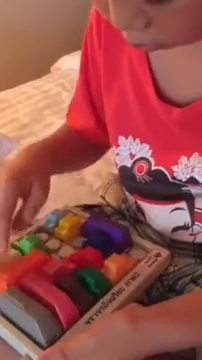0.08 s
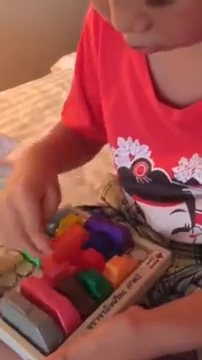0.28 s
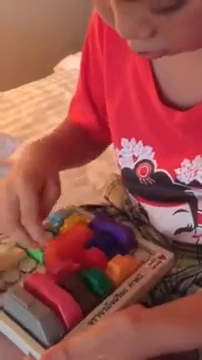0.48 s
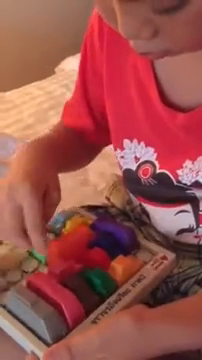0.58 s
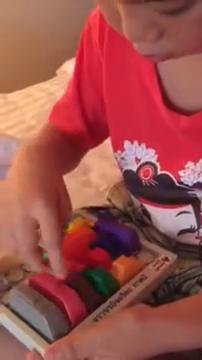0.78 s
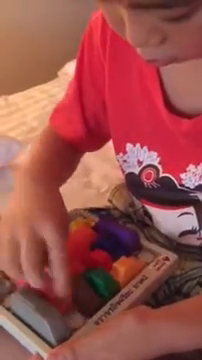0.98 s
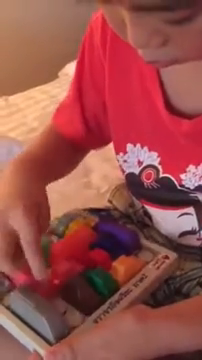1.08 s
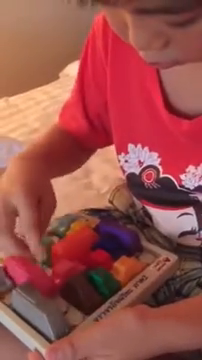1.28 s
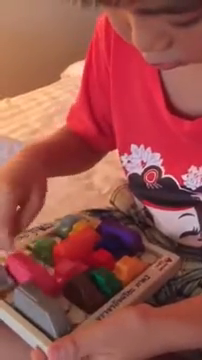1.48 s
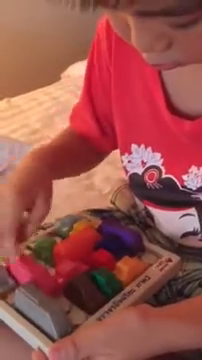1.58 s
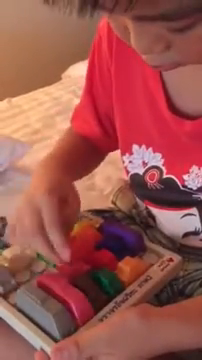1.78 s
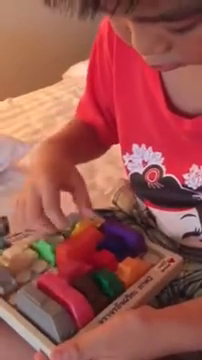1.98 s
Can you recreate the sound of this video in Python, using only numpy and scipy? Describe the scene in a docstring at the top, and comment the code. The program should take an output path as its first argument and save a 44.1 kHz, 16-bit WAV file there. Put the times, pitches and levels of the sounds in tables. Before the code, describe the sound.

Small plastic blocks click, clack and briefly scrape in a tray, close up, with a faint machine drone

```python
"""Hollow plastic pieces clack against each other and a plastic tray on a bed, close to a phone, in a small soft room.
Each clack is a short chatter of contacts that clicks dryly and rings the piece and the tray; pieces also scrape.
Single fading modes sound under the hardest blows, and decaying noise bands make the room.
A machine drones on many orders of its shaft speed and drops in level near the end, beside a steady low tone.
Noise shaped in frequency and level makes low rumble and hiss."""
import sys
import numpy as np
from scipy import signal
from scipy.fft import rfft, irfft
from scipy.io import wavfile
from scipy.ndimage import uniform_filter1d

SR = 44100
rng = np.random.default_rng(int(sys.argv[2]) if len(sys.argv) > 2 else 0)


def volts_from_db(level):
    """Convert decibel levels to linear amplitude ratios."""
    exponent = np.asarray(level, float) / 20
    return 10 ** exponent


def dump(signal):
    """Clip the signal to [-1, 1] and save it as 16-bit WAV at the path in sys.argv[1]."""
    limited = np.clip(np.atleast_2d(signal).T, -1, 1)
    pcm = np.round(limited * 32767).astype(np.int16)
    wavfile.write(sys.argv[1], SR, pcm)


N = 90405  # samples in the scene
RISE_S = 0.0008  # time constant of the onset of clacks and knocks


def curve(rows, at, log=False):
    """Straight lines between the first two columns of rows, optionally over log frequency."""
    x, y = np.array(rows, float).T[:2]
    if log:
        return np.interp(np.log(at + 1), np.log(x), y)
    return np.interp(at, x, y)


def colour(x, db_of_hz):
    """Causal minimum-phase filter with the given gain in dB."""
    hz = np.arange(2049) * SR / 4096
    cepstrum = irfft(db_of_hz(hz) * np.log(10) / 20)
    # folding the cepstrum forward in time makes the filter causal
    cepstrum[1:2048] *= 2
    cepstrum[2049:] = 0
    response = irfft(np.exp(rfft(cepstrum)))
    return signal.fftconvolve(x, response)[:len(x)]


def unit_rms(x):
    """Scale to rms 1."""
    return x / np.sqrt(np.mean(x ** 2) + 1e-30)


def unit_energy(x):
    """Scale to a sum of squares of 1."""
    return x / np.sqrt(np.sum(x ** 2))


def ring(hz, t60, t):
    """One mode: a sine that fades by 60 dB in t60 seconds."""
    return np.sin(2 * np.pi * hz * t) * np.exp(-np.log(1000) * t / t60)


def walk(rate):
    """Slow random wander with rms 1, from smoothed steps drawn rate times per second."""
    hold = int(SR / rate)
    steps = np.repeat(rng.standard_normal(N // hold + 1), hold)
    smooth = uniform_filter1d(uniform_filter1d(steps, hold), hold)
    return unit_rms(smooth[:N])


def add(out, x, start_s):
    """Mix x into out at start_s seconds."""
    i = int(start_s * SR)
    out[i:i + len(x)] += x[:N - i]


def contacts(env):
    """Dense tiny contacts of uneven size, carrying the energy of the envelope."""
    scatter_db = 2
    push, size = rng.standard_normal((2, len(env)))
    x = env * push * volts_from_db(scatter_db * size)
    return x * np.sqrt(np.sum(env ** 2) / np.sum(x ** 2))


def dry_click(t, treble_db):
    """A contact without ringing: an impulse coloured by the plastic body, thin in the bass."""
    # Spectrum of a dry contact. Each row: frequency in Hz, relative level in dB.
    body = [(150, -64), (250, -25.5), (779, -18), (1010, -7.5), (1600, -6.5), (1870, -0.5), (3150, -5.5),
            (4100, -9), (4970, -11), (7050, -13), (10400, -17.5), (13500, -17), (15000, -24.5),
            (16300, -52)]
    treble_hz, thin_below_hz, thin_db = 5200, 1100, -4

    def gain_db(f):
        treble = treble_db / (1 + (treble_hz / (f + 1)) ** 4)
        thin = thin_db / (1 + (f / thin_below_hz) ** 4)
        return curve(body, f, True) + treble + thin

    return colour((t == 0) * 1.0, gain_db)


def piece_ring(hz, t):
    """The walls of a hollow piece ring as modes around its main pitch."""
    # One value per wall mode: pitch as a ratio to the main pitch.
    walls = [1, .94, 1.08, 2.0]
    # One value per wall mode: relative level in dB.
    wall_db = [15.5, -26, 5, -8.5]
    # One value per wall mode: ring time (t60) in seconds.
    wall_t60 = [.055, .03, .03, .025]
    return sum(volts_from_db(db) * ring(hz * ratio, t60, t) for ratio, db, t60 in zip(walls, wall_db, wall_t60))


def tray_ring(t):
    """The plastic tray rings on fixed modes whose levels differ by chance at each excitation."""
    # Modes of the tray. Each row: frequency in Hz, relative level in dB.
    modes = [(570, -25), (850, -26), (1150, -21), (1450, -32), (1800, -15.5), (2090, -0.5), (2310, -10.5),
             (2620, -12), (3300, -10), (3600, -8), (3950, 4.5), (4180, 9.5), (4540, 4), (5300, -12.5),
             (6300, -7), (7000, 0.5)]
    t60, scatter_db = 0.035, 2  # s, dB
    chance = rng.standard_normal(len(modes))
    return sum(volts_from_db(db + scatter_db * c) * ring(hz, t60, t) for (hz, db), c in zip(modes, chance))


def struck(push, hz, ring_db, tray_db, treble_db):
    """Contacts click dryly and ring the piece and the tray, at levels in dB relative to the click."""
    t = np.arange(4096) / SR
    response = unit_energy(dry_click(t, treble_db))
    response = response + volts_from_db(ring_db) * unit_energy(piece_ring(hz, t))
    response = response + volts_from_db(tray_db) * unit_energy(tray_ring(t))
    return signal.fftconvolve(push, response)


def clacks(t):
    """Each clack is a burst of contacts that rises fast and dies away in a few milliseconds."""
    # Each row: start in seconds, level in dB, piece pitch in Hz, piece ring in dB re click,
    # tray ring in dB re click, treble boost of the click in dB.
    hits = [(0.248, -13.5, 1600, -4, -8.5, 1), (0.2913, -7.5, 1842, -3.5, -23.5, 3),
            (0.3042, -21.5, 1880, 0.5, -3.5, -6), (0.3251, -21, 1900, 4.5, -6, -1),
            (0.3328, -12.5, 1834, -1.5, -10.5, -5), (0.3544, -2.5, 2040, -15.5, -7, 7.5),
            (.357, -12.5, 2055, -4.5, -5.5, -1), (0.471, -38.5, 2383, 6.5, -12, -6),
            (.5107, -44, 2064, -7.5, -9.5, -16), (.984, -45, 3600, -4.5, -8, 0),
            (1.002, -44, 3325, 1, -9, -10), (1.0075, -44, 1920, -0.5, -5.5, -12),
            (1.034, -32.5, 2230, -5, -4, -11.5), (1.044, -27.5, 2680, -3, -10, -2),
            (1.0695, -14, 2007, -14.5, -8, 5.5), (1.0746, -19.5, 2140, 3.5, -8, -6),
            (1.0875, -17, 2185, 0.5, -14.5, 5), (1.0973, -16.5, 2094, -2, -10, -2),
            (1.1031, -10, 1916, -17.5, -12.5, 13), (1.1064, -8.5, 1795, -4, -18, -3),
            (1.1093, -17, 2087, -0.5, -5, -2.5), (1.126, -19.5, 1828, -4.5, -9.5, 0),
            (1.3102, -29.5, 3494, -2, -11.5, -5.5), (1.664, -14.5, 1746, -8, -12, 7.5),
            (1.6682, -16, 2405, -6, -8, 0.5), (1.7042, -21.5, 1633, -4.5, -3.5, 1.5),
            (1.7118, -18, 1910, -5.5, -7.5, 7), (1.717, -26, 2090, -6.5, -8, 0),
            (1.7235, -21.5, 2395, 2, -6.5, -3), (1.7496, -3.5, 4240, -18.5, -9, 6),
            (1.7527, -18, 2375, 1, -2.5, 11.5), (1.7698, -32, 2110, -2, 2.5, -16),
            (1.970, -59, 2050, 4, -6, -18)]
    chatter_s = 0.0032  # decay time constant
    out = np.zeros(N)
    env = (1 - np.exp(-t / RISE_S)) * np.exp(-t / chatter_s)
    for start, db, hz, ring_db, tray_db, treble_db in hits:
        add(out, volts_from_db(db) * struck(contacts(env), hz, ring_db, tray_db, treble_db), start)
    return out


def scrapes(t):
    """Pieces rub: a longer run of contacts with soft ends that mostly clicks and rings little."""
    # Each row: start in seconds, length in seconds, level in dB, treble boost in dB,
    # fade in dB per second (negative grows).
    rubs = [(0.977, 0.13, -60, -11, -1), (1.315, 0.038, -50.5, -18, 295), (0.246, 0.055, -31.5, -5, 200),
            (0.294, 0.064, -22, -2, 49), (1.038, 0.041, -35.5, -6, 102), (1.072, 0.028, -20.5, -0.5, 52),
            (1.108, 0.025, -20, -3, 296), (1.666, 0.041, -24, -6.5, 303.5),
            (1.711, 0.0429, -23.5, -6, 195.5), (1.758, 0.098, -23.5, -7.5, 306.5)]
    out = np.zeros(N)
    for start, length, db, treble_db, fade_db in rubs:
        rise = np.clip(t / 0.002, 0, 1)
        fall = np.clip((length - t) / 0.016, 0, 1)
        env = rise * fall * volts_from_db(-fade_db * t)
        add(out, volts_from_db(db) * struck(contacts(env), 1950, -14, -15, treble_db), start)
    return out


def knocks(t):
    """Single clear rings and thumps under the hardest blows, each one fading mode."""
    # Each row: start in seconds, level in dB, frequency in Hz, ring time (t60) in seconds.
    blows = [(.356, -34, 566, 0.047), (.3568, -13, 2092, 0.095), (0.3577, -18, 4113, 0.075),
             (1.107, -41, 590, 0.027), (1.1067, -14, 1812, .05), (1.7506, -29.5, 889, 0.048),
             (1.752, -20, 2396, .04)]
    out = np.zeros(N)
    for start, db, hz, t60 in blows:
        add(out, volts_from_db(db) * ring(hz, t60, t) * (1 - np.exp(-t / RISE_S)), start)
    return out


def pieces():
    """All sounds of the plastic pieces: clacks, scrapes and knocks."""
    t = np.arange(4096) / SR
    return clacks(t) + scrapes(t) + knocks(t)


def room(x):
    """A soft room: a noise tail in third-octave bands whose decay and level depend on the band."""
    # Each row: frequency in Hz, decay time (t60) in seconds, relative level in dB.
    rows = np.array([(302.7, 0.072, -21.5), (701, .2, -15.5), (1389, .3, -3), (2210, 0.36, -5),
                     (3200, .28, -5.5), (4950, 0.34, -9), (8000, 0.25, -6.5), (11000, 0.37, -13.5),
                     (15000, .2, -9.5)])
    fade_in_s = 0.0013
    t = np.arange(SR // 2) / SR
    noise = rng.standard_normal(len(t))
    tail = 0
    for hz in 220 * 2 ** np.arange(0, 6.4, 1 / 3):
        sos = signal.butter(2, [hz / 1.12, hz * 1.12], "band", fs=SR, output="sos")
        band = signal.sosfilt(sos, noise)
        t60 = curve(rows[:, :2], hz, True)
        level = volts_from_db(curve(rows[:, ::2], hz, True)) / np.sqrt(t60 * SR / 14)  # evens out the decay's energy
        tail = tail + band * np.exp(-np.log(1000) * t / t60) * level
    return signal.fftconvolve(x, tail * np.clip(t / fade_in_s, 0, 1))[:N]


def shaft_drone(t):
    """Sines on whole multiples of the shaft speed, each wavering a little in level."""
    # Shaft speed. Each row: time in seconds, frequency of the eighth order in Hz.
    shaft = [(0.0, 113.9), (0.52, 114.1), (0.612, 115.2), (1.52, 115.0)]
    # Levels of shaft orders 3 to 16, in dB.
    order_db = [-59.5, -46, -58.5, -52.5, -58.5, -35, -59.5, -53, -54, -53.5, -64, -66, -74, -68.5]
    # Loudness of the whole drone. Each row: time in seconds, gain in dB.
    drone_db = [(0, -0.5), (.3, -2), (.8, -1.5), (1.2, -2), (1.5, 0), (1.56, -18), (1.8, -15.5),
                (1.93, -24), (2.05, -30.5)]
    turn = 2 * np.pi * np.cumsum(curve(shaft, t) / 8) / SR  # shaft angle in radians
    drone = 0
    for order, db in enumerate(order_db, 3):
        waver = volts_from_db(db + 1.1 * walk(1.4))
        drone = drone + waver * np.sin(order * turn + rng.uniform(0, 7))
    return volts_from_db(curve(drone_db, t)) * drone


def steady_tone(t):
    """A low tone that wavers in level and slightly in pitch, apart from the shaft speed."""
    # Each row: time in seconds, level in dB.
    tone_db = [(0, -47), (1.5, -47.5), (1.6, -47.5), (1.93, -53.5), (2.0, -41.5), (2.05, -47)]
    level = volts_from_db(curve(tone_db, t) + 2.5 * walk(8))
    hz = 96 + 1.1 * walk(8.9)
    return level * np.sin(2 * np.pi * np.cumsum(hz) / SR)


def machine(t):
    """The shaft drone and the steady tone; the root of 2 turns their levels from peak to rms."""
    return np.sqrt(2) * (shaft_drone(t) + steady_tone(t))


def air(t):
    """Shaped noise: low rumble, a flickering low-middle band and faint hiss."""
    # Spectrum of the background. Each row: frequency in Hz, relative level in dB per Hz.
    spectrum = [(15, -37), (25, -21.5), (87, -12), (127, -18.5), (162, -12.5), (295, -35), (468, -41),
                (946, -40.5), (1280, -41.5), (1970, -43), (3210, -52.5), (12800, -64), (15000, -74),
                (16300, -100.5)]
    # Rumble. Each row: time in seconds, level in dB.
    rumble_db = [(0, -55.5), (.7, -58), (1.45, -65), (1.55, -46.5), (1.65, -49.5), (1.75, -62),
                 (1.85, -50.5), (1.93, -69), (2.0, -41), (2.05, -51.5)]
    # Low-middle band and hiss together. Each row: time in seconds, level in dB.
    hiss_db = [(0, -59), (.3, -57.5), (.6, -57), (.9, -59), (1.2, -56), (1.45, -59), (1.62, -58),
               (1.95, -62), (2.05, -56.5)]
    split_hz, flicker_db = 246, 2.5
    f = np.arange(N // 2 + 1) * SR / N
    low = 1 / (1 + (f / split_hz) ** 4)
    high = 1 - 1 / (1 + (f / 900) ** 4)

    def shaped(power_share):
        white = rfft(rng.standard_normal(N))
        return irfft(white * volts_from_db(curve(spectrum, f, True)) * np.sqrt(power_share), N)

    middle = volts_from_db(flicker_db * walk(12)) * shaped((1 - low) * (1 - high))
    hiss = volts_from_db(0.6 * walk(6)) * shaped(high)
    rumble = volts_from_db(curve(rumble_db, t)) * unit_rms(shaped(low))
    return rumble + volts_from_db(curve(hiss_db, t)) * unit_rms(middle + hiss)


def scene():
    """Pieces in the room over machine and air, in mono."""
    t = np.arange(N) / SR
    near = pieces()
    return (near + room(near) + machine(t) + air(t))[None]


def roll_off(x):
    """The treble ends steeply here."""
    return signal.sosfilt(signal.butter(12, 16470, fs=SR, output="sos"), x)


def record(dry):
    """The phone rounds the peaks and cuts both ends of the spectrum."""
    rounded = np.tanh(1.15 * dry) / 1.15
    low_pass = signal.ellip(8, 0.2, 60, 16300, fs=SR, output="sos")
    high_pass = signal.butter(2, 53, "high", fs=SR, output="sos")
    mix = signal.sosfilt(high_pass, signal.sosfilt(low_pass, rounded))
    return roll_off(mix)


dry = scene()
out = record(dry)
dump(out)
```